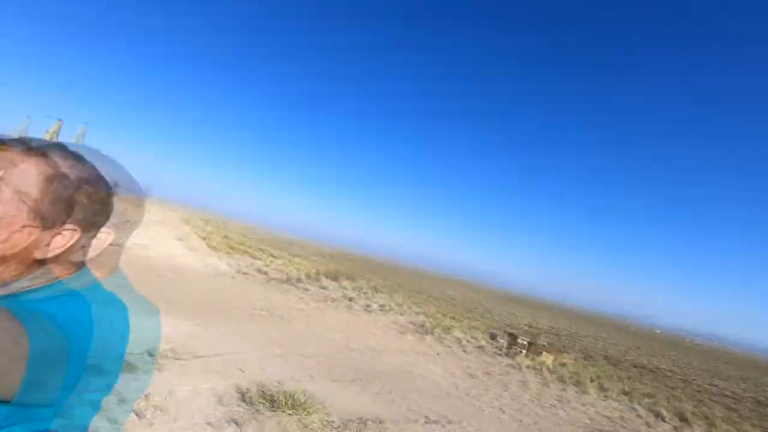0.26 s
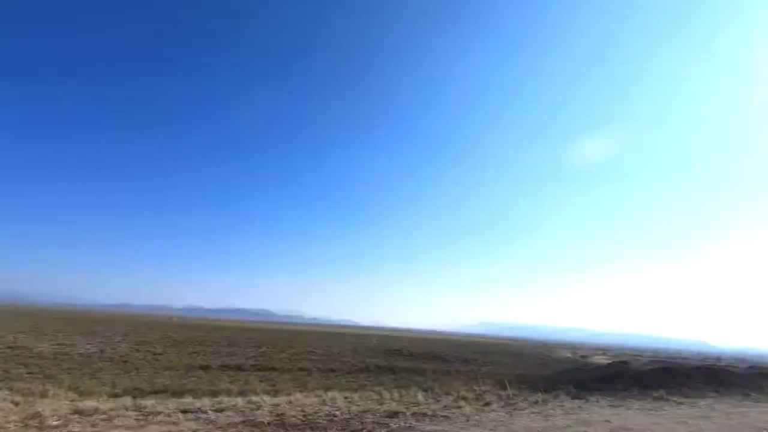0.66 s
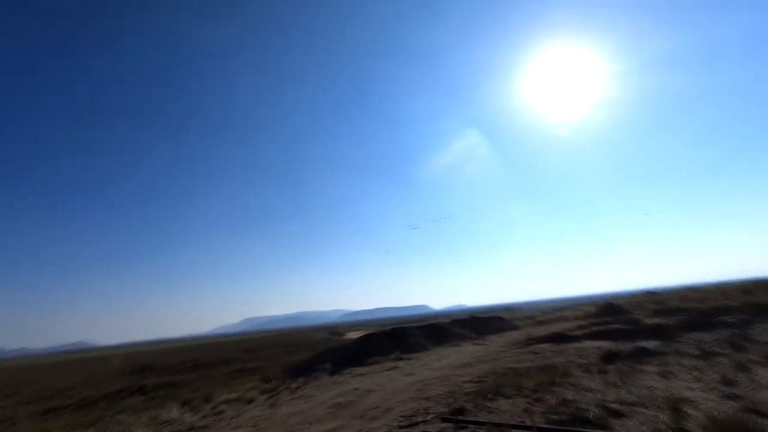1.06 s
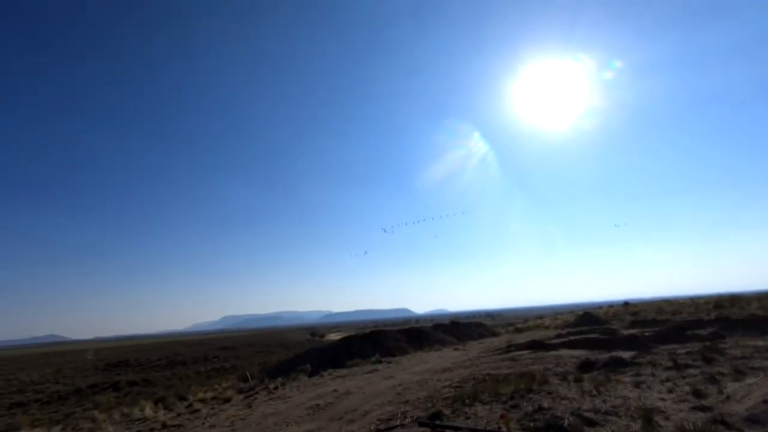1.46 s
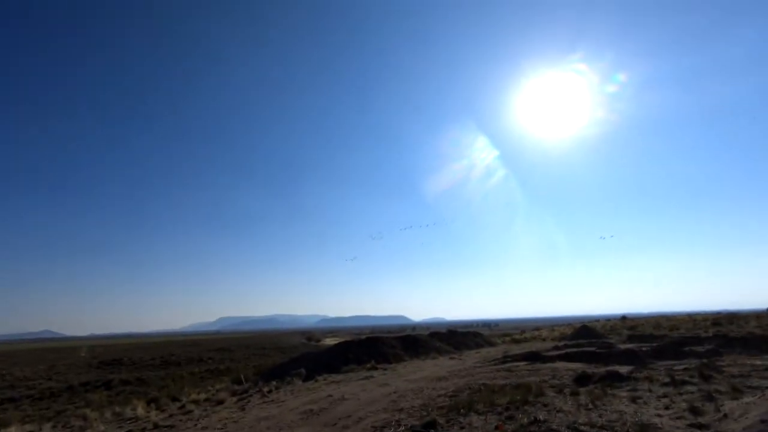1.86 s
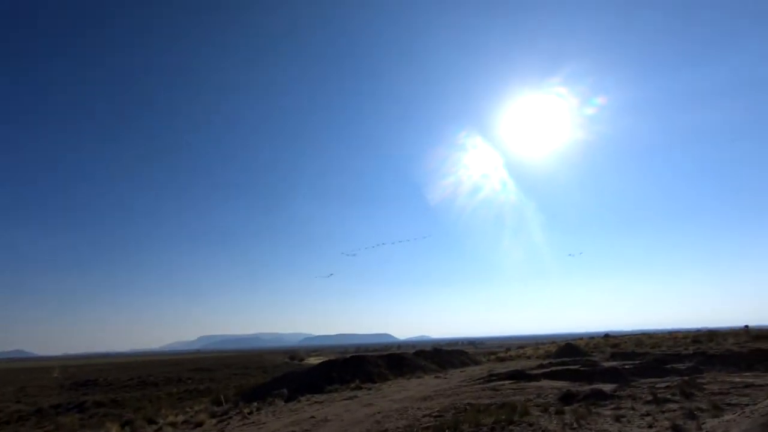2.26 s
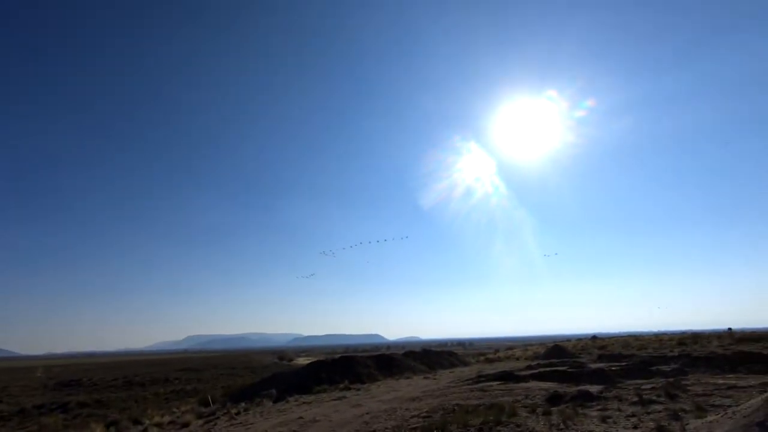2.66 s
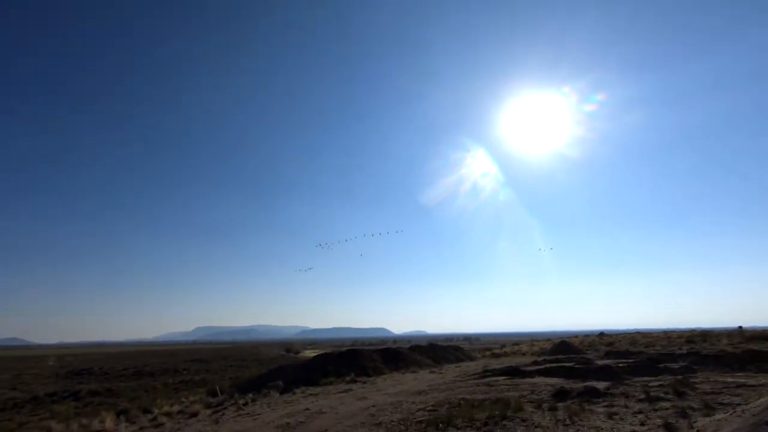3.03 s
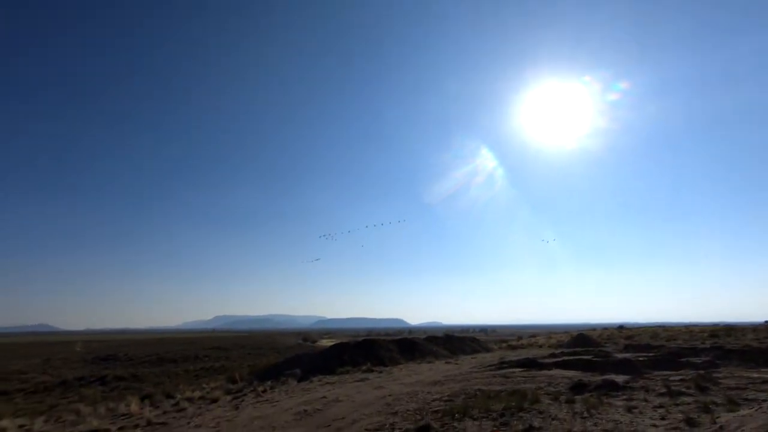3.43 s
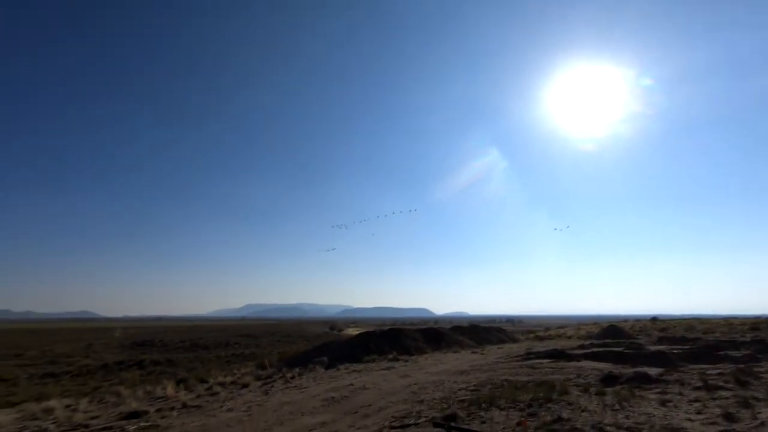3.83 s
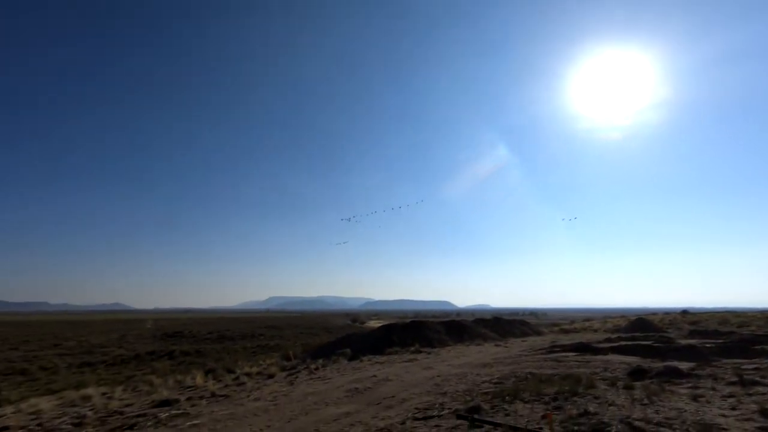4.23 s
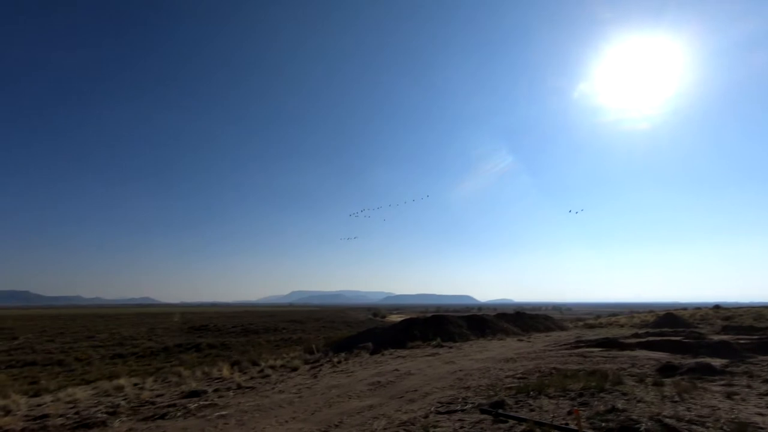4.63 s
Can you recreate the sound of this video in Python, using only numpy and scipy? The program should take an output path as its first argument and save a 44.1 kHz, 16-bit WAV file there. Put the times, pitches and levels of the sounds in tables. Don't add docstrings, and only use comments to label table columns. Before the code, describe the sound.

Distant cranes give rattling, bugling calls over open desert while wind thumps a small microphone and hollow steel clanks twice nearby.

```python
import sys
import numpy as np
from scipy import signal
from scipy.fft import rfft, irfft, next_fast_len
from scipy.io import wavfile
from scipy.ndimage import uniform_filter1d, map_coordinates

SR = 44100
rng = np.random.default_rng(int(sys.argv[2]) if len(sys.argv) > 2 else 0)


def boost(x):
    u = np.asarray(x, float) / 20
    return 10 ** u


def dump(signal):
    limited = np.clip(np.atleast_2d(signal).T, -1, 1)
    pcm = np.round(limited * 32767).astype(np.int16)
    wavfile.write(sys.argv[1], SR, pcm)


N = 211123


def unit(x):
    return x / np.sqrt(np.mean(x ** 2) + 1e-20)


def curves(rows):
    s, *cols = np.transpose(rows)
    return [np.interp(np.arange(N) / SR, s, c) for c in cols]


def wobble(rate, size=N):
    knots = rng.standard_normal(int(size * rate / SR) + 4)
    return map_coordinates(knots, [np.arange(size) * rate / SR])


def noise(spectrum):
    m = next_fast_len(N + 8192)
    f, db = np.transpose(spectrum)
    log_hz = np.log(np.fft.rfftfreq(m, 1 / SR) + 1)
    gain = boost(np.interp(log_hz, np.log(f + 1), db, -120, -120))
    return unit(irfft(rfft(rng.standard_normal(m)) * gain, m)[:N])


def even(x, seconds):
    span = round(seconds * SR)
    power = np.abs(uniform_filter1d(uniform_filter1d(x ** 2, span), span))
    return unit(x / np.sqrt(power + 0.057))


def swells(times, rises, falls):
    late = np.arange(N) / SR - times[:, None]
    return np.exp(-np.abs(late) / np.where(late < 0, rises[:, None], falls[:, None]))


def grains(events, spectrum):
    s, db, rise, fall = np.transpose(events)
    return boost(db) @ swells(s, rise, fall) * unit(boost(2.8 * wobble(300)) * noise(spectrum))


def add(out, s, sound):
    part = out[max(round(s * SR), 0):][:len(sound)]
    part += sound[:len(part)]


def step(t, at, width):
    return .5 + .5 * np.tanh((t - at) / width)


# time in seconds, strength in dB.
BREEZE = [(0, -42), (.07, -53), (.15, -52), (.27, -43), (.38, -58.5), (.5, -62), (.64, -53.5), (.72, -62.5),
          (1.06, -68.5), (1.2, -64), (1.6, -61.5), (1.76, -52), (1.9, -60.5), (2.9, -63), (3.5, -60.5),
          (4.3, -63), (4.6, -61), (4.79, -74.5)]
# peak in seconds, buffet peak in dB, rise in seconds, slow heave over buffet in dB.
GUSTS = [(0, -48.5, 0.016, 14), (.13, -38.5, 0.079, -4.5), (.21, -31.5, 0.042, -9),
         (0.371, -38.5, 0.14, -9), (.55, -42, 0.083, -1), (.64, -36.5, 0.022, 1.5), (.77, -62.5, 0.17, 16),
         (0.949, -60, .11, 18), (1.139, -42, 0.038, -4), (1.18, -48, 0.046, 13),
         (1.283, -30.5, 0.027, -5.5), (1.437, -40.5, 0.04, 2.5), (1.6, -64.5, .04, 14),
         (1.76, -46.5, 0.037, -10), (1.81, -63.5, 0.057, 13), (2.041, -50.5, 0.082, 5),
         (2.481, -43.5, 0.043, 6), (2.555, -32, 0.046, -10.5), (2.768, -49, 0.092, 5),
         (3.09, -44, 0.091, 3), (3.193, -40.5, 0.031, 0.5), (3.347, -40, 0.025, 0.5), (3.529, -41, 0.1, -5),
         (3.98, -58.5, 0.25, 12), (4.141, -39.5, 0.077, -6), (4.501, -39, 0.086, 0.5),
         (4.6, -31.5, 0.045, -4), (4.649, -46.5, 0.027, 19.5), (4.719, -34, 0.011, 4),
         (4.768, -35.5, 0.0078, -1.5)]
# Hz, dB per Hz.
HEAVE = [(8, -8.5), (20, 8), (45, 6.5), (65, -18.5), (100, -60)]
BUFFET = [(35, -37), (55, 3.5), (70, 0.5), (120, -12.5), (170, -19.5), (300, -56.5)]
FLUTTER = [(76, -29), (130, -7), (193, -3.5), (321, -15.5), (354, -20), (405, -21.5), (560, -34),
           (730, -67.5), (1230, -120)]


def wind():
    breeze_db, = curves(BREEZE)
    s, db, rise, heave_db = np.transpose(GUSTS)
    gusts = swells(s, rise, 1.14 * rise) ** 2
    eddy = wobble(16)
    heave_power = boost(2 * (db + heave_db)) @ gusts + boost(2 * (breeze_db.mean() + 3))
    heave = np.sqrt(heave_power) * even(noise(HEAVE), 0.072)
    buffet_power = boost(2 * db) @ gusts + boost(2 * (breeze_db - 1))
    buffet = np.sqrt(buffet_power) * boost(1.1 * eddy) * even(noise(BUFFET), 0.052)
    flutter = boost(breeze_db + 0.39 * eddy + 1.7 * wobble(25)) * even(noise(FLUTTER), 0.044)
    return heave + buffet + flutter


# time in seconds, level in dB.
FAR_LEVEL = [(0, -58.5), (.19, -68.5), (.4, -62), (.69, -71.5), (1.12, -72.5), (1.24, -64.5), (1.65, -71),
             (1.81, -63.5), (2.09, -69), (2.68, -70.5), (2.88, -62.5), (2.97, -66.5), (3.2, -70),
             (3.8, -71.5), (3.89, -69), (4.28, -71), (4.65, -76), (4.79, -67.5)]
# Hz, dB per Hz.
FLOCK = [(310, -42.5), (520, -13), (580, -15.5), (616, -7.5), (774, -3), (869, -6), (1510, -20.5),
         (1910, -19.5), (2200, -33), (2860, -59.5), (4840, -120)]


def far_flock():
    flock_db, = curves(FAR_LEVEL)
    return boost(flock_db - 3.0) * unit(boost(3 * wobble(23.985)) * noise(FLOCK))


# peak in seconds, hiss in dB, rise and fall in seconds, rustle over the hiss in dB.
STIRS = [(0, -85.5, .1, 0.097, 9), (.15, -81, 0.35, 0.56, -23), (.23, -90.5, 0.095, 0.13, 8.5),
         (.45, -96, .05, .08, 5), (.6, -93, .03, .04, 6.5), (.75, -86, 0.19, 0.53, -3.5),
         (1.811, -86.5, 0.14, 0.89, -16), (2.46, -86.5, 0.2, 0.21, -23), (2.94, -80.5, 0.083, 0.18, -10.5),
         (3.35, -91.5, 0.35, 0.82, -2.5), (4.04, -86.5, 0.18, 1, -11), (4.62, -80, .012, .1, -14),
         (4.73, -79.5, 0.16, 0.2, -13)]
# Hz, dB per Hz.
RUSTLE = [(1900, -40.5), (2200, 2.5), (3700, -3), (4200, -30)]
HISS = [(3550, -39.5), (3740, -0.5), (4250, -1.5), (4600, -3.5), (5700, -10), (6500, -21.5), (7500, -30.5)]


def brush_and_site():
    s, db, rise, fall, rustle_db = np.transpose(STIRS)
    stirs = swells(s, rise, fall) ** 2
    rustle = np.sqrt(boost(2 * (db + rustle_db)) @ stirs) * boost(0.59 * wobble(9.2)) * noise(RUSTLE)
    return rustle + np.sqrt(boost(2 * db) @ stirs) * boost(1.3 * wobble(14)) * noise(HISS)


def tone(hz, partials, rough):
    size = len(hz)
    unsteady_hz = hz * (1 + rough * .03 * wobble(120, size=size))
    phase = 2 * np.pi * np.cumsum(unsteady_hz) / SR + 2 * np.pi * rng.random()
    upper = sum(gain * np.sin((k + 2) * phase) for k, gain in enumerate(partials))
    voice = np.sin(phase) + upper * boost(rough * 5.7 * wobble(160, size=size))
    return voice * boost(rough * 3.8 * wobble(82, size=size))


# start and length in seconds, start and end pitch in Hz, peak in dB.
BUGLES = [(0.001, .07, 1010, 870, -59), (0.15, .06, 745, 715, -65), (0.3, .08, 990, 960, -64),
          (0.425, .06, 735, 690, -67), (1.122, .018, 940, 925, -68), (1.147, .05, 1135, 1120, -57),
          (1.15, .045, 935, 920, -64), (1.15, .035, 850, 845, -66), (1.21, .05, 950, 920, -66),
          (1.368, .052, 865, 845, -58), (1.905, .014, 980, 930, -64), (1.945, .014, 990, 950, -63),
          (1.99, .014, 1010, 950, -63), (2.04, .016, 990, 900, -63), (2.07, .095, 1000, 950, -64.5),
          (2.305, .022, 850, 810, -62), (2.372, .018, 800, 790, -63), (2.436, .018, 830, 880, -61),
          (2.452, .028, 715, 670, -66), (2.485, .02, 660, 640, -69), (2.678, .028, 680, 620, -66),
          (2.733, .022, 700, 660, -62), (2.788, .03, 700, 670, -62), (2.845, .09, 735, 655, -59.5),
          (2.95, .02, 1130, 1100, -57), (3.055, .02, 1120, 1090, -57), (3.822, .014, 720, 700, -69)]
# Hz, dB.
THROAT = [(1360, 1), (1480, 0), (1600, -13), (1740, -8), (1870, 1), (1980, -22), (2270, -24)]


def bugles(t):
    out, puffs = np.zeros(N), np.zeros(N)
    for s, length, start_hz, end_hz, db in BUGLES:
        second_db = np.interp(2 * start_hz, *np.transpose(THROAT))
        hz = start_hz + (end_hz - start_hz) * np.clip(t / length, 0, 1.3) ** 1.7
        fray = np.clip(.14 * (-60 - db), 0, .45)
        size = boost(db) * step(t, 0.0077, 0.0084) * (1 - step(t, length, 0.0029))
        dull_db = .05 * max(4 * start_hz - 2950, 0)
        partials = boost([second_db - 6 * fray, -38, -21 - 25 * fray - dull_db])
        add(out, s, size * tone(hz, partials, rough=.25 + fray))
        add(puffs, s, boost(-24.0 + 22 * fray) * size)
    return out, puffs


# pulse start in seconds, onset level in dB, length in seconds.
FAINT_CALLS = [
    [(.069, -58, 0.049), (.137, -63, 0.045), (.241, -61.5, 0.047), (.291, -56.5, 0.016),
     (.368, -56.5, 0.012), (.41, -53.5, .018), (.515, -55, 0.011), (.608, -55, 0.0099),
     (.655, -60.5, 0.0084), (.7, -63, 0.012), (.74, -64.5, 0.011)],
    [(1.89, -64, 0.018), (1.927, -57, 0.013), (1.97, -53.5, 0.016), (2.014, -53.5, 0.02),
     (2.063, -56, 0.024), (2.13, -62, 0.04)],
]
FIRST_CALLS = [
    [(.891, -62, 0.019), (.928, -56.5, 0.022), (.969, -54.5, 0.022), (1.01, -50, 0.021),
     (1.055, -51.5, 0.032), (1.108, -50.5, 0.056), (1.148, -54, 0.048), (1.213, -56.5, 0.022),
     (1.242, -57, 0.015)],
    [(1.285, -60, 0.014), (1.321, -59.5, 0.014), (1.355, -57, 0.014)],
    [(1.541, -57, 0.011), (1.586, -51, .016), (1.611, -60, .017), (1.628, -52.5, 0.013), (1.713, -57, 0.05),
     (1.763, -53, 0.032)],
]
LATER_CALLS = [
    [(2.206, -57, 0.042), (2.264, -51, 0.046), (2.338, -50, 0.037), (2.399, -50, 0.044),
     (2.455, -60.5, 0.02)],
    [(2.733, -53, 0.019), (2.785, -49.5, 0.022), (2.843, -46, 0.017)],
    [(2.865, -55, .016), (2.904, -50.5, 0.021), (2.945, -47, 0.031), (2.999, -47.5, 0.034),
     (3.046, -47.5, 0.045)],
    [(3.628, -54, 0.028), (3.674, -47.5, 0.015), (3.718, -47, 0.011), (3.758, -47.5, 0.013),
     (3.803, -47.5, 0.023), (3.85, -49, 0.044)],
]
# onset pitch at full effort in Hz, held pitch in Hz.
CALLERS = [(850, 790), (690, 650), (1170, 985), (960, 890), (815, 775), (865, 742), (835, 760), (1145, 975),
           (818, 785)]
HELD_DB = [-5, -2.5, -3.5, -10, -7.5, -5.5, -5, -6, -9.5]
# 2nd, 3rd and 4th partial against the first, in dB.
VOICES = [(-11.5, -39, -50), (-23, -39, -50), (-21, -36, -39), (-12, -40, -50), (-11, -39, -50),
          (-9, -26, -48), (-19, -27, -48), (-19, -40, -48), (-16, -40, -50)]
BURST_UPPER_DB = [-4, -1, 2]


def rattles(t):
    out, puffs = np.zeros(N), np.zeros(N)
    calls = FAINT_CALLS + FIRST_CALLS + LATER_CALLS
    for call, (top_hz, call_hz), held_db, voice in zip(calls, CALLERS, HELD_DB, VOICES):
        full_db = max(db for _, db, _ in call)
        for s, onset_db, length in call:
            sag = .022 * max(full_db - onset_db - 4, 0)
            onset_hz = max(top_hz * (1 - sag), .92 * call_hz)
            held_hz = call_hz * (1 - .4 * sag)
            drop = step(t, .012, .0022)
            hz = onset_hz * (1.03 - 4.55 * t) * (1 - drop) + held_hz * (1.015 - 0.55 * t) * drop
            burst = boost(onset_db) * np.exp(-((t - .0055) / np.where(t < .0055, .0028, .0055)) ** 2)
            size = burst + boost(onset_db + held_db) * drop * (1 - step(t, length, 0.002))
            partials = boost(voice)[:, None] * boost(np.outer(BURST_UPPER_DB, 1 - drop))
            add(out, s, size * tone(hz, partials, rough=.55))
            linger = boost(onset_db - 3.5) * drop * np.exp(-t / (.6 * length))
            linger = linger * (1 - step(t, length, 0.0019))
            add(out, s, linger * tone(onset_hz * (1 - 0.57 * t), [boost(voice[0] - 10.5)], rough=0.41))
            add(puffs, s, boost(-23.5) * burst + boost(-22.5) * size)
    return out, puffs


# Hz, dB per Hz.
RASP = [(500, -24), (800, 5.5), (1500, -1), (2500, -21.5), (4500, -23), (6000, -43.5)]


def cranes():
    t = np.arange(SR // 6) / SR
    notes, note_puffs = bugles(t)
    pulses, pulse_puffs = rattles(t)
    birds = notes + pulses + (note_puffs + pulse_puffs) * noise(RASP)
    scatter = rng.standard_normal(len(t)) * boost(-60 * t / .3) * step(t, 0.0066, .003)
    return birds + boost(-13.0) * signal.fftconvolve(birds, scatter / np.linalg.norm(scatter))[:N]


# peak in seconds, level in dB, rise and fall in seconds.
GRIT = [(.209, -61, 0.035, 0.062), (.14, -70, .05, .04), (.29, -68, .02, .03), (.356, -70, 0.038, 0.017),
        (.569, -51.5, 0.0015, 0.0048), (.61, -64, 0.013, 0.024), (1.7, -59, 0.034, 0.07),
        (.72, -69, 0.046, 0.043), (2.94, -63.5, 0.063, 0.028), (4.39, -73.5, 0.019, 0.029),
        (4.611, -64, 0.0042, 0.016)]
# Hz, dB per Hz.
CRUNCH = [(180, -31), (300, -9), (547, -20), (692, -10.5), (1340, -14), (1530, -20), (3970, -33),
          (8640, -59), (10000, -66), (13000, -102), (22000, -120)]


def grit():
    return grains(GRIT, CRUNCH)


# peak in seconds, level in dB, rise and fall in seconds.
TICKS = [(.21, -79, 0.0063, 0.0072), (.36, -77, .005, 0.0073), (.569, -84, 0.0017, 0.003),
         (.59, -81, 0.0027, 0.0045), (.73, -78.5, 0.0063, 0.0103), (1.285, -75.5, 0.014, 0.009),
         (1.665, -59.5, 0.0014, 0.007), (2.028, -83, .004, .005), (2.947, -86, .002, 0.0041),
         (4.143, -78.5, .003, .006), (4.611, -69, 0.0028, 0.0039), (4.722, -70, 0.0016, 0.0022)]
# Hz, dB per Hz.
TICK = [(1200, -24), (2600, -3.5), (3500, 0), (5800, -7), (8500, -13.5), (10000, -36.5)]


def casing_ticks():
    return grains(TICKS, TICK)


# centre in seconds, pitch in Hz, peak in dB,
# half length in seconds.
THUDS = [(.23, 155, -31, 0.0074), (0.299, 424, -54, 0.0072), (0.407, 189, -31.5, 0.0082),
         (0.57, 410, -49, 0.0027), (.6, 149, -43, 0.025), (1.671, 264, -45, 0.011),
         (2.953, 111, -43.5, 0.0099), (3.64, 189.5, -50.5, .03), (3.728, 221, -51, 0.017),
         (4.419, 138, -44, 0.0083), (1.515, 60, -40, .008), (3.96, 198, -54.5, 0.025),
         (4.04, 189, -52.5, 0.023), (2.025, 87, -37.5, 0.012), (4.141, 82, -28.5, 0.0083),
         (4.603, 94.6, -24.5, 0.0061), (4.788, 44.7, -40, 0.0032)]


def thuds():
    t = np.arange(N) / SR
    out = np.zeros(N)
    for s, hz, db, half in THUDS:
        out += boost(db) * np.exp(-((t - s) / half) ** 2) * np.cos(2 * np.pi * hz * (t - s))
    return out


def steel(modes, blows, spectrum):
    out, crash, t = np.zeros(N), np.zeros(N), np.arange(SR) / SR
    for s, ring_db, rise, crash_db, crash_t60 in blows:
        ring = np.zeros(SR)
        for hz, db, t60 in modes:
            shiver_db = 4.0 * np.tanh(hz / 1500) * wobble(54, size=SR)
            ring += boost(db - 60 * t / t60 + shiver_db) * np.sin(2 * np.pi * hz * t)
        add(out, s, boost(ring_db) * (1 - np.exp(-(t / rise) ** 2)) * ring)
        add(crash, s, boost(crash_db - 60 * t / crash_t60) * (1 - np.exp(-t / 0.0025)))
    return out + crash * noise(spectrum)


# Hz, dB, seconds to fall by 60 dB.
SKID = [(2714, 0.5, 0.092), (3830, -3, 0.09), (4170, 3, 0.11), (4680, -6, 0.12), (6030, -10, 0.083)]
BOOM = [(209.5, -1, .72), (202.5, -1.5, .62)]
DRUM = [(402, -11.5, 0.56), (430.4, -11, 0.5), (731, -8.5, 0.25), (829, -11, 0.33), (1440, -20.5, 0.35),
        (1660, -14, 0.29), (1984, -35, 1.04), (2700, -15, 0.075), (3830, -14, 0.12), (4118, -11, 0.091),
        (4651, -9.5, 0.1), (5980, -22, 0.089), (3930, -10, 0.14), (7880, -23, 0.061)]
# start in seconds, ring in dB, rise in seconds, crash in dB, seconds for the crash to fall 60 dB.
SKID_BLOWS = [
    (1.637, -69, .012, -78, .2),
    (1.651, -61.5, 0.0074, -62, 0.11),
    (1.664, -58, 0.0041, -71, .1),
]
DRUM_BLOWS = [
    (1.663, -39.5, 0.0096, -43.5, 0.085),
    (1.673, -50, 0.0043, -51, 0.12),
    (1.712, -56.5, 0.0037, -65, 0.16),
    (1.748, -66.5, .004, -70, .3),
]
# Hz, dB per Hz.
DRUM_CRASH = [(290, -51), (500, -15), (791, -4.5), (1050, -24), (1220, -12), (1380, -26), (1620, -10),
              (2240, -20), (3260, -27), (4100, -13.5), (5450, -32), (11000, -54), (13900, -49.5),
              (14800, -84), (22000, -120)]


def hollow_steel():
    return steel(BOOM + DRUM, DRUM_BLOWS, DRUM_CRASH) + steel(SKID, SKID_BLOWS, DRUM_CRASH)


# Hz, dB, seconds to fall by 60 dB.
BAR = [(1222, -9, .26), (1486, -12, .33), (1663, -12, .18), (1884, -16, .56), (1959, -19, .5),
       (2460, -26, .68), (2956, -5, .17), (3375, -11, .25), (3769, -5.5, .33), (3807, -5, .21),
       (3919, -1, .27), (4007, -11, .3), (4111, -11, .25), (4217, -15, .3)]
# start in seconds, ring in dB, rise in seconds, crash in dB, seconds for the crash to fall 60 dB.
BAR_BLOWS = [
    (3.857, -64, 0.028, -67.5, 0.37),
    (3.884, -55, 0.0098, -55.5, 0.18),
]
# Hz, dB per Hz.
BAR_CRASH = [(350, -32), (600, -2.5), (1060, -8), (1330, 1.5), (2610, -17.5), (3020, -18.5), (3190, -19.5),
             (3890, -12.5), (7500, -39), (9750, -78), (16500, -120)]


def steel_bar():
    return steel(BAR, BAR_BLOWS, BAR_CRASH)


def scene():
    air = wind() + far_flock() + brush_and_site() + cranes()
    near = grit() + casing_ticks() + thuds()
    return (air + near + hollow_steel() + steel_bar())[None]


def level_db(x, seconds):
    return 10 * np.log10(np.abs(uniform_filter1d(x ** 2, round(seconds * SR))) + 1e-14)


def band_limit(x):
    return signal.sosfilt(signal.butter(12, 14500, fs=SR, output="sos"), x)


# Hz, dB per Hz.
NOISE_FLOOR = [(3530, -29), (6000, -3.5), (7180, -10.5), (8180, -2.5), (9010, -5.5), (10000, -11.5),
               (11000, -17), (11900, -6), (12600, 2), (12850, -40), (22000, -120)]


def record(dry):
    x = dry + boost(-94.5 + 1.6 * wobble(12)) * noise(NOISE_FLOOR)
    treble = signal.sosfiltfilt(signal.butter(8, 4400, "high", fs=SR, output="sos"), x)
    middle = signal.sosfiltfilt(signal.butter(6, [2250, 3600], "band", fs=SR, output="sos"), x)
    gust = step(level_db(x, 0.051), -39, 1.1)
    faint = 1 - step(level_db(treble, 0.014), -83, 2)
    thin = 1 - step(level_db(middle, 0.03), -86, 2)
    starved = x - gust * (0.7 * faint * treble + 0.7 * thin * middle)
    return band_limit(starved * np.tanh(np.arange(N) / 200))


dry = scene()
out = record(dry)
dump(out)
```